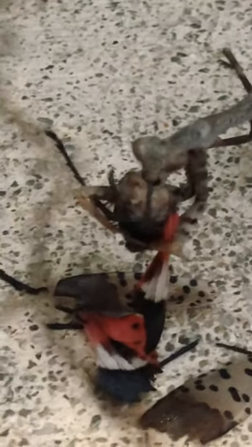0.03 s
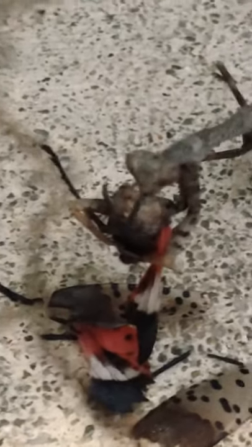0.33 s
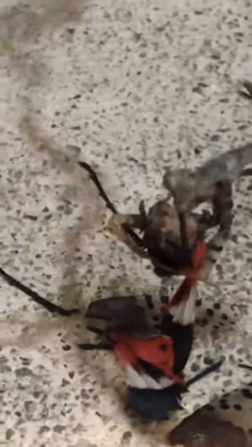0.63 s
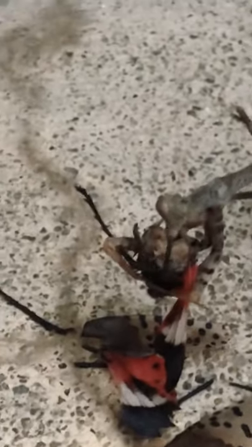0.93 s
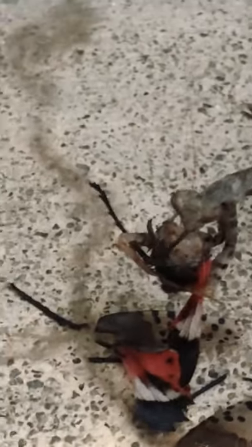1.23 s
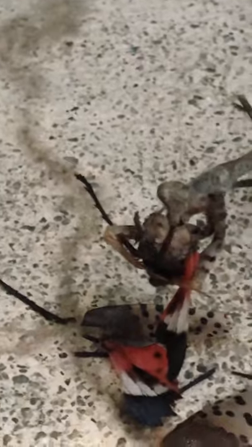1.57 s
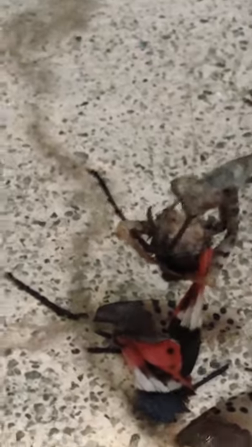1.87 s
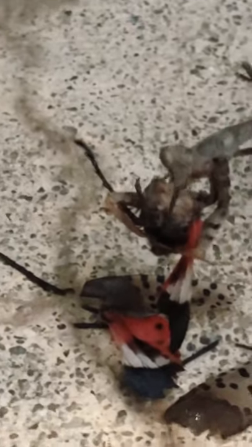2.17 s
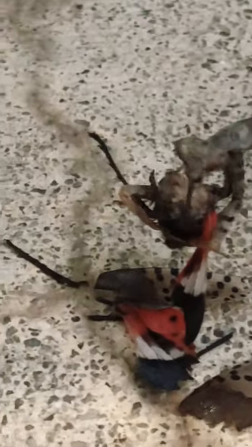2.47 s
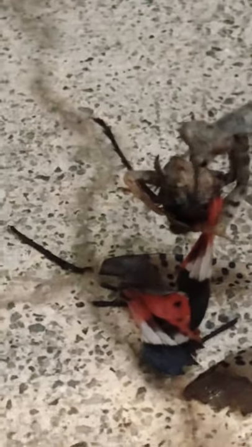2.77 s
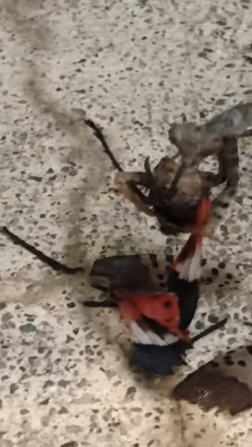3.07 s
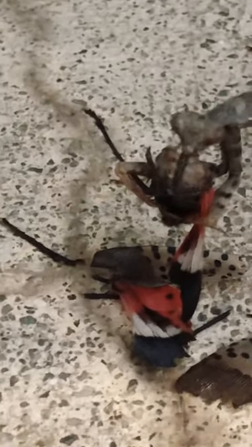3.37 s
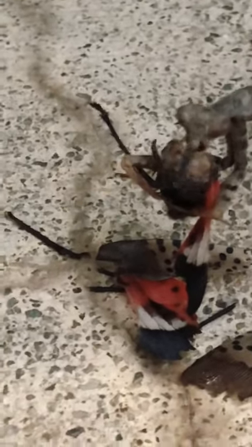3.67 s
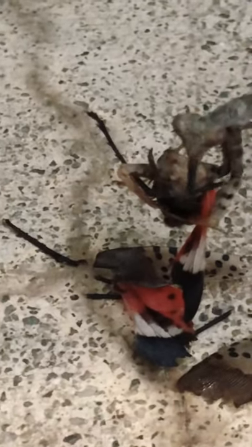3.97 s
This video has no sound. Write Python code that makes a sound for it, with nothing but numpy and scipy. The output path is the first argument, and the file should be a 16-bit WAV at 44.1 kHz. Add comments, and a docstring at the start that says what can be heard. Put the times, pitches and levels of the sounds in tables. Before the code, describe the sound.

Low rumble and hiss of far traffic, with faint cricket chirps and a car pulling away.

```python
"""Outdoors, one microphone by a concrete step. From the start, distant traffic rumbles under a steady
hiss and a near cricket chirps about four times a second with its wings, fainter crickets behind it.
In the first two seconds or so, a twig prodding a dead insect on the concrete makes tiny ticks and
scrapes, and an insect farther off rasps twice. Near three seconds a far car pulls away; the insect
rasps once more, and the exhaust note drops at a gear change, then builds again."""
import sys
import numpy as np
from scipy import signal
from scipy.fft import rfft, irfft
from scipy.io import wavfile

SR = 44100
rng = np.random.default_rng(int(sys.argv[2]) if len(sys.argv) > 2 else 0)


def unload_audio(sound):
    """Save the sound as a 16-bit wav file, at the path given as the first command line argument."""
    columns = np.transpose(np.atleast_2d(sound))
    # keep every value between -1 and 1, then stretch to whole-number steps
    steps = np.round(np.clip(columns, -1, 1) * 32767)
    wavfile.write(sys.argv[1], SR, steps.astype(np.int16))


N = 176400
T = np.arange(N) / SR
HZ = np.fft.rfftfreq(N, 1 / SR)

# The cricket near the microphone. Each row: time in seconds, relative level in dB, pitch in Hz, pulses.
NEAR_CHIRPS = [(.161, -72, 6696, 5), (0.397, -71, 6701, 5), (.621, -69.5, 6680, 5), (.846, -69.5, 6680, 5),
               (1.104, -70.5, 6700, 5), (1.343, -70.5, 6660, 6), (1.594, -68.5, 6660, 5),
               (1.811, -69.5, 6663, 5), (2.032, -71, 6620, 5), (2.272, -74, 6700, 5),
               (2.525, -71.5, 6600, 5), (2.746, -71, 6670, 5), (2.977, -72, 6710, 5), (3.210, -73, 6670, 5),
               (3.437, -73, 6689, 5), (3.688, -73, 6670, 5), (3.924, -75, 6661, 4)]
# The twig ticking on the step. Each row: start in seconds, level in dB, lower mode in Hz,
# upper mode in Hz, upper mode against the lower in dB.
TWIG_TICKS = [(.4748, -57, 3720, 3980, -2), (.4805, -61, 3350, 3700, -2), (1.1255, -59.5, 2960, 3984, -5)]
# The twig scraping. Each row: start in seconds, nominal length in seconds, level in dB,
# centre in Hz, width in Hz.
TWIG_SCRAPES = [(0.345, .04, -80, 9500, 7000), (.4748, .008, -71, 14000, 9000),
                (0.957, 0.045, -73, 13500, 9000), (1.057, .02, -74, 7000, 7000),
                (1.13, .015, -82, 14000, 6000), (1.785, .09, -80, 8500, 2500),
                (2.258, 0.013, -82, 12000, 9000)]
# The far car's exhaust note. Each row: time in seconds, firing rate in Hz, level in dB.
CAR_NOTE = [(2.85, 96, -66), (3.0, 100, -51), (3.08, 103, -49.5), (3.18, 112, -43), (3.255, 120, -52),
            (3.32, 124.5, -41), (3.45, 135, -52), (3.52, 139, -51), (3.58, 106, -52.5), (3.74, 108, -53),
            (3.86, 110, -45), (4.0, 111, -43.3)]
# Overtones that the silencer lets through. Each row: multiple of the firing rate, level in dB,
# start in seconds, length in seconds.
EXHAUST_OVERTONES = [(1.5, -53.5, 3.15, .25), (1.76, -51, 3.15, .42), (1.66, -52, 3.57, .22),
                     (2, -54, 3.52, .65)]
# Crickets farther off. Each row: pitch in Hz, width in Hz, opening level in dB, first chirp in seconds,
# chirp period in seconds, growth in dB per second.
DISTANT_CRICKETS = [(6950, 140, -86, .222, .222, 1.6), (7310, 200, -80.5, .01, .2585, -.3)]
# The rasping insect behind. Each row: start in seconds, length in seconds, level in dB.
INSECT_RASPS = [(.34, 0.054, -83), (1.79, 0.19, -81), (3.41, .17, -82)]
# Rumble of the far roads. Each row: frequency in Hz, relative spectral level in dB.
RUMBLE_SPECTRUM = [(18, -46), (28, -26), (36, -24), (45, -11), (56, -5), (72, -2), (88, -6), (105, -0.5),
                   (122, -2.5), (160, -5.5), (190, -7), (225, -6), (262, -11.5), (300, -13), (340, -17),
                   (430, -19.5), (520, -22), (740, -24.5), (810, -29), (900, -28), (1150, -30.5),
                   (1400, -36.5)]
# The traffic's rise and fall. Each row: time in seconds, gain in dB.
TRAFFIC_SWELL = [(0, 0), (.4, 0.5), (1, 0.35), (1.6, -0.5), (2.3, 0), (2.8, -1.5), (3.3, 0.5), (4, 2.2)]
# Hums of far engines and machines. Each row: centre in Hz, level before the swell in dB, width in Hz.
ENGINE_HUMS = [(116.3, -58, 17.4), (360.3, -73.5, 24), (736.4, -76.5, 16), (2130, -87.5, 11)]
# Low swells of passing engines. Each row: start in seconds, length in seconds, level in dB,
# centre in Hz, width in Hz.
ENGINE_SURGES = [(0.105, .55, -50.5, 137, 62), (1.898, 0.31, -57, 125, 26)]
# Hiss of the open air. Each row: frequency in Hz, relative spectral level in dB.
AIR_SPECTRUM = [(820, -32), (1400, -1.5), (1680, 0), (1800, -1.5), (1910, 0.5), (2410, -1), (2610, -4),
                (3530, -3), (4280, -6.5), (5390, -7), (6330, -11), (6860, -10), (9370, -17.5),
                (15500, -23.5)]
SPLIT_HZ = 1400  # rumble below, hiss above


def near_cricket(gain_db=1.5, pulse_s=.016, every_s=.021, sag_hz=70, echo_db=-11, echo_s=.02):
    """Close by, each wing stroke is a short falling tone; nearby surfaces smear it slightly."""
    out = np.zeros(N)
    progress = np.arange(0, pulse_s, 1 / SR) / pulse_s
    for start, db, hz, pulses in NEAR_CHIRPS:
        for k, (size, detune, phase) in enumerate(rng.standard_normal((round(pulses), 3))):
            turns = np.cumsum(hz + 12 * detune - sag_hz * (progress - .5)) / SR
            gain = amp(db + gain_db + 1.1 * size - 3 * (k == 0))  # the first stroke is softer
            pulse = gain * np.sin(np.pi * progress) * np.sin(2 * np.pi * (turns + phase))
            part = out[round((start + k * every_s - pulse_s / 2) * SR):][:len(pulse)]
            part += pulse[:len(part)]
    tail = rng.standard_normal(SR // 4) * np.exp(-T[:SR // 4] / echo_s)
    return out + amp(echo_db) * signal.fftconvolve(out, tail / np.linalg.norm(tail))[:N]


def twig(t60_s=.035, rise_s=.0006, rough=.78, grit_db=2):
    """On the step, dry ticks ring briefly in two modes; gritty scrapes start fast and die away."""
    out = np.zeros(N)
    for start, db, low_hz, high_hz, upper_db in TWIG_TICKS:
        age = np.maximum(T - start, 0)
        ring = sum(gain * np.sin(2 * np.pi * hz * age) * (1 + rough * band(0, 900))
                   for hz, gain in [(low_hz, 1), (high_hz, amp(upper_db))])
        out += amp(db - 60 * age / t60_s) * np.minimum(age / rise_s, 1) * ring
    grit = amp(grit_db * band(0, 500))
    for start, length, db, hz, width in TWIG_SCRAPES:
        stroke = np.maximum(T - start, 0) / (.25 * length)  # peaks a quarter of the way in
        out += amp(db) * stroke * np.exp(1 - stroke) * grit * band(hz, width)
    return out


def far_car(road_db=-29):
    """Far off, a muffled exhaust note climbs, drops at the gear change and builds again."""
    times, firing_hz, note_db = np.transpose(CAR_NOTE)
    turns = np.cumsum(np.interp(T, times, firing_hz)) / SR

    def exhaust_tone(multiple, rough):
        tone = np.sqrt(2) * np.sin(2 * np.pi * (multiple * turns + rng.random()))
        return tone * (1 + rough * band(0, 25))

    note = exhaust_tone(1, rough=.041)
    overtones = sum(amp(db) * arch(start, length) * exhaust_tone(multiple, rough=.11)
                    for multiple, db, start, length in EXHAUST_OVERTONES)
    road = amp(road_db) * band(1800, 1600)
    return amp(np.interp(T, times, note_db, left=-100)) * (note + road) + overtones


def far_insects(chorus_db=-86, sharpness=1.5):
    """A faint steady chorus, crickets blurred by distance into throbbing bands, and higher rasps."""
    out = amp(chorus_db) * band(7940, 950)
    for hz, width, db, first, period, growth in DISTANT_CRICKETS:
        throb = np.exp(sharpness * (np.cos(2 * np.pi * (T - first) / period) - 1) / 2)
        out += amp(db + growth * T) * throb * band(hz, width)
    rasps = sum(amp(db) * arch(start, length) for start, length, db in INSECT_RASPS)
    return out + rasps * band(8740, 460)


def far_traffic(rumble_db=-49, waver_db=.22):
    """Tyre and engine noise carries from far roads, with a few wavering hums and low swells."""
    swell = amp(np.interp(T, *np.transpose(TRAFFIC_SWELL)) + waver_db * band(0, 8.9))
    hums = sum(amp(db) * band(hz, width) for hz, db, width in ENGINE_HUMS)
    surges = sum(amp(db) * arch(start, length) * band(hz, width)
                 for start, length, db, hz, width in ENGINE_SURGES)
    rumble = amp(rumble_db) * noise(spectrum(RUMBLE_SPECTRUM) * (HZ < SPLIT_HZ))
    return swell * (rumble + hums) + surges


def air_hiss(base_db=-68, follow=.56):
    """Behind everything, a smooth distant hiss swells a little with the traffic."""
    level_db = base_db + follow * np.interp(T, *np.transpose(TRAFFIC_SWELL))
    return amp(level_db) * noise(spectrum(AIR_SPECTRUM) * (HZ >= SPLIT_HZ))


def amp(db):
    """Decibels to gain."""
    return 10 ** (np.asarray(db) / 20)


def spectrum(points):
    """Gain at every frequency from (Hz, dB) points."""
    hz, db = np.transpose(points)
    return amp(np.interp(np.log(HZ + 1), np.log(hz + 1), db))


def noise(gain):
    """Noise shaped by a gain at every frequency, scaled to an rms of one."""
    shaped = irfft(rfft(rng.standard_normal(N)) * gain, N)
    return shaped / np.sqrt(np.mean(shaped ** 2) + 1e-30)


def band(hz, width_hz):
    """Noise in one bell-shaped band; centred on 0 Hz, a random waver."""
    return noise(np.exp(-2 * ((HZ - hz) / width_hz) ** 2))


def arch(start, length):
    """A half-sine swell."""
    return np.sin(np.pi * np.clip((T - start) / length, 0, 1))


def scene():
    """Everything that reaches the microphone by the step, in mono."""
    return (far_traffic() + air_hiss() + far_car() + near_cricket() + far_insects() + twig())[None]


def record(dry, edge_hz=15720, fade_s=.004):
    """The recorder's band limit, with soft ends."""
    ends = np.sin(np.pi / 2 * np.minimum(np.minimum(T, T[::-1]) / fade_s, 1)) ** 2
    lowpass = signal.firwin(801, edge_hz, window=("kaiser", 8), fs=SR)
    return signal.oaconvolve(dry * ends, lowpass[None], "same")


dry = scene()
out = record(dry)
unload_audio(out)
```